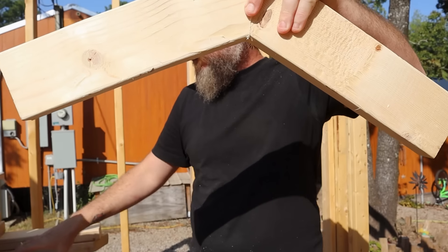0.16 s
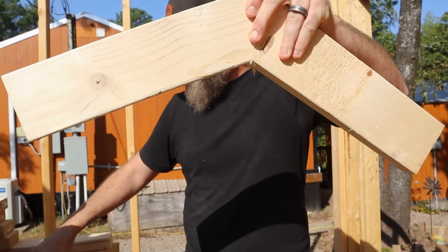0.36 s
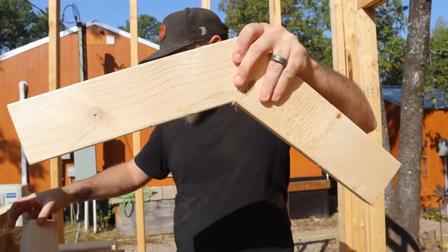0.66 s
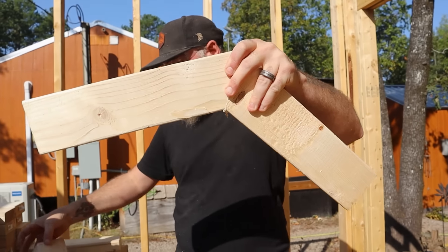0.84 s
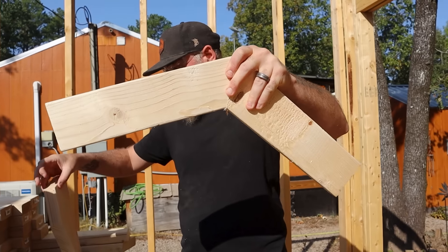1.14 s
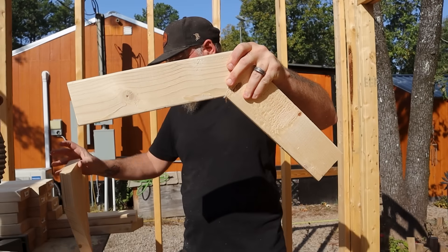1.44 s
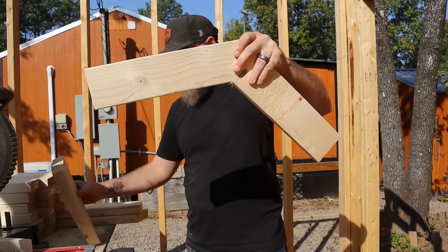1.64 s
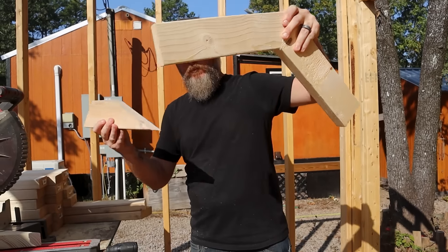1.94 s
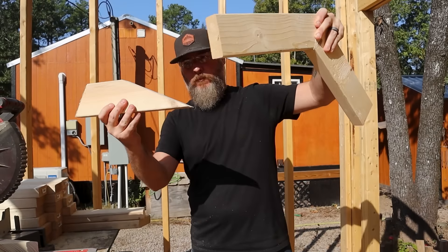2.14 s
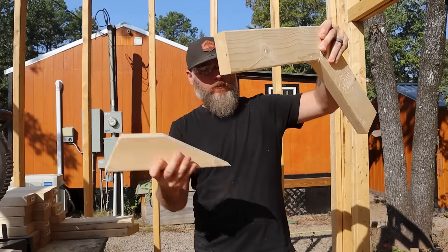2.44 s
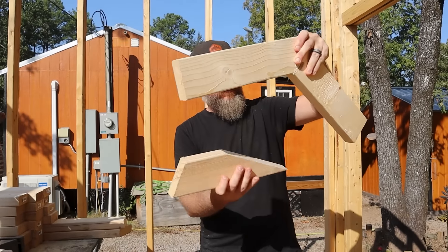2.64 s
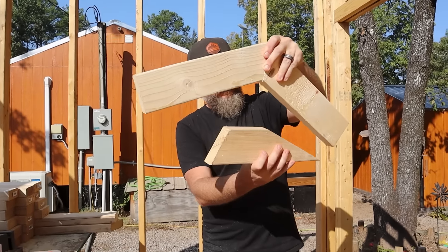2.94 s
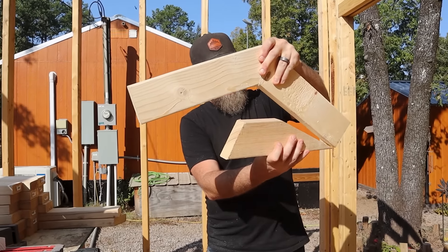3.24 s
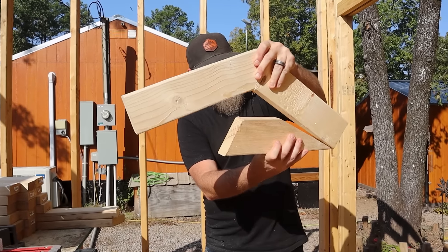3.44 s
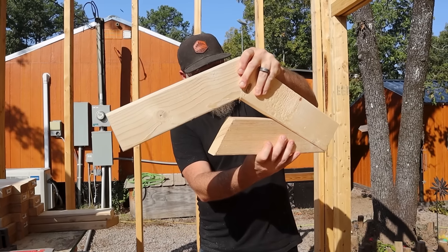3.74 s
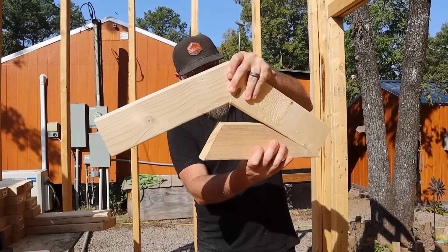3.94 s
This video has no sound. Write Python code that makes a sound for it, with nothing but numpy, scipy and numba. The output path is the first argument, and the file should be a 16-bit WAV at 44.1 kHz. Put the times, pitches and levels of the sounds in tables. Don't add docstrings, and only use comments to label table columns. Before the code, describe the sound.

Short pine boards knock, scrape and clatter on a stack outdoors, then quiet yard air with a distant crow and small birds.

```python
import sys
import numpy as np
from scipy import signal
from scipy.io import wavfile
from scipy.ndimage import uniform_filter1d
from numba import njit

SR = 44100
rng = np.random.default_rng(int(sys.argv[2]) if len(sys.argv) > 2 else 0)


def nominal_scale(level):
    x = np.asarray(level, float) / 20
    return 10 ** x


def materialize(psi):
    bounded = np.clip(np.atleast_2d(psi).T, -1, 1)
    quanta = np.round(bounded * 32767).astype(np.int16)
    wavfile.write(sys.argv[1], SR, quanta)


N = 180280
TIME = np.arange(N) / SR


@njit
def ring(x, hz, t60):
    pole = np.exp(2j * np.pi * hz / SR - np.log(1000) / (t60 * SR))
    state = 0j
    y = np.empty(len(x))
    for i in range(len(x)):
        state = state * pole + x[i]
        y[i] = state.imag
    return y


def unit(x):
    return x / np.sqrt(np.mean(x ** 2))


def band(x, hz, width_hz):
    return signal.lfilter(*signal.iirpeak(hz, hz / width_hz, fs=SR), x)


def steep_band(x, hz, width_hz):
    return unit(band(band(x, hz, width_hz), hz, width_hz))


def walk(rate_hz):
    hold = int(SR / rate_hz)
    steps = np.repeat(rng.standard_normal(N // hold + 1), hold)
    return unit(uniform_filter1d(uniform_filter1d(steps, hold), hold)[:N])


def grit(spread_db):
    size_db = spread_db * np.minimum(rng.exponential(size=N), 4)
    return unit(rng.standard_normal(N) * nominal_scale(size_db))


def with_echoes(x, t60, wet_db):
    t = TIME[:SR // 2]
    tail = rng.standard_normal(len(t)) * nominal_scale(-60 * t / t60) * (t > .006)
    tail *= nominal_scale(wet_db) / np.sqrt(np.sum(tail ** 2))
    return x + signal.fftconvolve(x, tail)[:N]


# freq_hz, level_db_per_hz
YARD_SPECTRUM = [(15, -26), (25, 5.5), (70, -1), (92, -11.5), (123, -3.5), (150, -14.5), (205, -13),
                 (300, -11.5), (604, -15), (881, -17.5), (1400, -13), (2000, -18.5), (4500, -23),
                 (15800, -33.5)]
# freq_hz, rms_db
MAINS_HUM = [(61, -68.5), (121, -69.5)]


def yard():
    hz, db = np.transpose(YARD_SPECTRUM)
    noise, swell = 0, walk(0.374)
    for f in 22 * 2 ** np.arange(0, 9.5, 1 / 3):
        level_db = np.interp(np.log(f), np.log(hz), db) + 10 * np.log10(f)
        flicker_db = 1.8 * min(1, 1200 / f) ** 0.36 * walk(10)
        level_db = level_db + 0.64 * swell + flicker_db
        noise = noise + nominal_scale(level_db) * steep_band(rng.standard_normal(N), f, f / 3)
    hum = sum(nominal_scale(d + 8.5 + 3.1 * walk(4.98)) * np.sin(2 * np.pi * f * TIME) for f, d in MAINS_HUM)
    return nominal_scale(-54) * unit(noise) + hum


def calls(notes, flutter_hz, rough):
    out, drift = np.zeros(N), walk(90)
    for s, length, db, start_hz, middle_hz, end_hz in notes:
        part = slice(int(s * SR), int((s + length) * SR))
        u = np.clip((TIME[part] - s) / length, 0, 1)
        arch = np.sin(np.pi * u)
        pitch = start_hz + (end_hz - start_hz) * u + (middle_hz - (start_hz + end_hz) / 2) * arch
        flutter_phase = 2 * np.pi * np.cumsum(flutter_hz * (1 + 0.11 * drift[part])) / SR
        tone_phase = 2 * np.pi * np.cumsum(pitch * (1 + 0.011 * drift[part])) / SR
        out[part] += nominal_scale(db) * arch ** 0.17 * (1 + rough * np.sin(flutter_phase)) * np.sin(tone_phase)
    return out


# start_s, length_s, level_db, top_hz
CROW_CAWS = [(2.096, 0.092, -46, 1490), (2.58, 0.031, -51, 1462), (2.625, .065, -52, 1436),
             (3.076, .095, -49.5, 1490), (3.201, 0.137, -60.5, 1394), (3.569, 0.06, -56.5, 1360)]
# start_s, length_s, level_db, start_hz, end_hz
BIRD_CHIRPS = [(2.17, .07, -61, 1920, 2014), (2.709, 0.035, -61, 2800, 2850), (2.7, .05, -65, 4050, 3950),
               (2.935, .025, -60, 2910, 2200), (3.0, .037, -63, 2910, 2500), (3.07, .029, -63, 2810, 2500),
               (3.343, 0.029, -59.5, 3220, 2500), (3.42, 0.028, -59, 2800, 2350),
               (3.623, .016, -57, 3090, 2300), (3.651, .093, -62, 2500, 1980),
               (3.999, 0.044, -59, 1316, 1050)]
# start_s, level_db
INSECT_PULSES = [(.16, -74), (.33, -71), (1.5, -76), (1.86, -75), (2.67, -73), (3.47, -80), (3.66, -78)]


def birds():
    caws = [(s, length, db, .92 * hz, hz, .91 * hz) for s, length, db, hz in CROW_CAWS]
    chirps = [(s, length, db, a, 1.03 * (a + b) / 2, b) for s, length, db, a, b in BIRD_CHIRPS]
    pulses = [(s, .052, db, 9290, 9290, 9290) for s, db in INSECT_PULSES]
    far = calls(caws, 114.8, 0.5) + calls(chirps, 90, 0.75) + calls(pulses, 70, 0.55)
    return with_echoes(far, t60=0.47, wet_db=-5.0)


# freq_hz, t60_s, level_db
STACK_MODES = [(63.1, 0.27, -10.5), (95.1, 0.12, -7.5), (136, 0.11, -4.5), (179, 0.27, -2), (213, 0.19, -1),
               (286, 0.027, -8.5)]
# freq_hz, width_hz, level_db
RASP_BANDS = [(637, 306, 2), (963, 190, -4), (1400, 420, 6), (1896, 265, -2.5)]
# peak_s, shake_db, settling_db_per_s, clatter_above_shake_db
STACK_JOLTS = [(.01, -62, 300, 18), (.095, -33, 168, -1.5), (.25, -37, 174, -10), (.44, -38.5, 250, -8),
               (.52, -38, 170, 0), (.68, -42.5, 150, -22), (.77, -38.5, 132, -2.5), (.86, -38.5, 200, 4),
               (.92, -36, 202, 3.5), (1.051, -36, 114, 1), (1.2, -51, 150, -14), (1.35, -35, 136, -12.5),
               (1.62, -47.5, 200, -16), (1.55, -54, 52, 1.5), (1.73, -49.5, 250, -9),
               (1.8, -48, 202, -14.5), (1.93, -49.5, 150, -0.5), (2.03, -40, 350, -14),
               (2.1, -35, 154, -12), (2.2, -47, 150, 0), (2.35, -46, 90, -5.5), (2.5, -45, 250, -13.5)]


def stack():
    s, db, settle, clatter_db = np.transpose(STACK_JOLTS)[:, :, None]
    late = TIME - s
    build_up = 1.56
    shake = nominal_scale(db - np.abs(settle) * np.where(late > 0, late, -build_up * late))
    clatter = np.sum(shake * nominal_scale(clatter_db), axis=0)
    rings = [nominal_scale(db) * unit(ring(grit(spread_db=5.5), float(hz), t60)) for hz, t60, db in STACK_MODES]
    drag = unit(sum(nominal_scale(db) * band(grit(spread_db=0.0), hz, w) for hz, w, db in RASP_BANDS[:2]))
    deep = shake.sum(axis=0) * unit(sum(rings[:2]))
    return deep + clatter * (unit(sum(rings[2:])) + nominal_scale(-17.5) * drag)


# start_s, length_s, level_db, open_hz, narrowest_hz
AIR_GAPS = [(1.14, .13, -50.5, 817, 1297), (2.005, .13, -52.5, 596, 780), (.0, 0.057, -48.5, 657, 680),
            (.55, 0.18, -54.5, 1400, 1382), (.625, .043, -50, 2140, 2160), (.71, .072, -63, 2000, 2090)]


def gaps():
    notes = [(s, length, db, hz, top, hz) for s, length, db, hz, top in AIR_GAPS]
    return calls(notes, 46.5, 0.16) * unit(band(rng.standard_normal(N), 34, 74))


# freq_hz, width_hz, level_db
FINE_BANDS = [(7320, 1400, -7), (9470, 960, -2.5), (10440, 1350, -2), (11800, 2700, 0.5), (14200, 5200, -8)]


def scuffs(rows, body, spread, broad_db):
    slips = grit(spread_db=2.5) * nominal_scale(2.2 * walk(250))

    def resonances(bands, wide):
        return unit(sum(nominal_scale(db + 2.8 * walk(30.07)) * steep_band(slips, hz, wide * w) for hz, w, db in bands))

    wood, fine, rasp = resonances(body, spread), resonances(FINE_BANDS, 2), resonances(RASP_BANDS, 2)
    wood = unit(wood + nominal_scale(broad_db) * steep_band(slips, 3160, 5100))
    out = np.zeros(N)
    for s, length, db, bright_db, slant, (fine_db, rasp_db) in rows:
        part = slice(int(s * SR), int((s + length) * SR))
        u = (TIME[part] - s) / length
        shape = np.sin(np.pi * np.clip(u, 0, 1)) ** 0.37 * nominal_scale(db + 2.7 * slant * (2 * u - 1))
        mix = wood[part] + nominal_scale(fine_db + bright_db) * fine[part] + nominal_scale(rasp_db - bright_db) * rasp[part]
        out[part] += shape * mix
    return out


# start_s, length_s, level_db, brightness_db, slant (-1 fading to 1 growing)
WOOD_DRAGS = [(.0, 0.053, -62.5, -7, -0.26), (0.052, .1, -51, 1, -.21), (.461, .1, -49, -1, 0.9),
              (0.556, 0.094, -57, 4.5, .1), (0.822, 0.062, -46, 0.5, -1), (1.016, 0.054, -50, 1.5, -.27),
              (1.137, 0.16, -64, -3.5, -.04), (1.393, 0.14, -58, -2.5, .24), (1.953, 0.15, -57, 1.5, .39),
              (2.33, 0.043, -57.5, -1.5, -.42), (2.394, .026, -59, 4, 0.015), (2.603, 0.077, -59, 3, .1)]
# start_s, length_s, level_db, slant
FINGER_RUBS = [(0.624, 0.054, -46.5, .84), (0.862, 0.016, -45.5, .1), (0.91, .025, -55, .1),
               (1.577, .041, -49, .2), (1.695, 0.07, -51.5, .5), (1.808, 0.017, -55, -.3),
               (2.438, 0.066, -49.5, -.02), (2.51, 0.034, -60, .1)]
# start_s, length_s, level_db, brightness_db
FACE_SLAPS = [(.568, .0078, -58, -1), (.668, .008, -43, -6), (0.694, .015, -52, 5),
              (0.819, 0.0097, -40.5, -2), (.841, .0049, -46, -8), (0.879, .01, -52.5, 7.5),
              (.976, 0.0077, -51.5, -2.5), (1.062, .0058, -48, -4), (1.1, .011, -45, 2.5),
              (1.298, 0.01, -42, 8), (1.308, 0.0071, -36, 4), (3.386, .014, -60.5, -7)]
# start_s, level_db, brightness_db
SPLINTER_TICKS = [(1.188, -54, -5), (1.226, -61, -2), (1.454, -66, -5), (1.467, -60, 0), (1.473, -53.5, -2),
                  (1.488, -58, 1), (1.512, -61.5, 2), (1.52, -57, -2), (1.641, -52, -6), (1.776, -57, -.3),
                  (3.023, -65, -8)]


def contacts():
    drags = [(*row, (-7, 3.6)) for row in WOOD_DRAGS]
    rubs = [(s, length, db, 0, slant, (-5.5, -20)) for s, length, db, slant in FINGER_RUBS]
    slaps = [(*row, -.3, (-9, 1.3)) for row in FACE_SLAPS]
    ticks = [(s, 0.0057, db, bright_db, 0, (4.9, -6)) for s, db, bright_db in SPLINTER_TICKS]
    return drags + rubs + slaps + ticks


# freq_hz, width_hz, level_db
GRAIN_BANDS = [(2130, 60, 0), (2590, 70, -6), (3300, 110, 0), (3620, 90, -3), (4300, 110, -4),
               (4930, 120, -5), (5900, 200, -3)]
# freq_hz, width_hz, level_db
PALM_BANDS = [(1330, 98, -7), (1910, 100, -5), (3460, 170, 1.5), (3680, 80, -4), (4340, 430, -10),
              (4980, 100, -7), (5460, 300, -6), (5900, 350, -4)]
# start_s, length_s, level_db, slant
PALM_BRUSH = (3.825, .11, -47, -0.3)


def rubbing():
    s, length, db, slant = PALM_BRUSH
    out = scuffs(contacts(), GRAIN_BANDS, spread=4.1, broad_db=6)
    out += scuffs([(s, length, db, 0, slant, (-11.5, -14))], PALM_BANDS, spread=2.2, broad_db=-17)
    return with_echoes(out + gaps(), t60=0.089, wet_db=-13.5)


def pushes(blows):
    force = np.full(N, 1e-18)
    for s, db, ms in blows:
        push = np.hanning(int(max(ms, .2) * SR / 1000) + 2)
        push = np.r_[.45 * push, -push] / push.sum()
        force[int(s * SR):int(s * SR) + len(push)] += nominal_scale(db) * push
    return force


# freq_hz, t60_s, end_db, middle_db, edge_db (by place struck)
BOARD_MODES = [(137, 0.042, -57, 14, -23), (162.3, 0.068, 8, 10, -34), (216.6, 0.14, -4.5, .3, -3),
               (279, 0.048, -0.5, 7, -24), (320.6, .09, -5, 2.5, 5.5), (362.4, 0.069, -0.5, 5, 3.5),
               (417, 0.11, -6.5, -9.5, -12.5), (488.6, 0.091, 1, 2, -1), (555.6, 0.048, 5, 2, 7),
               (638.6, 0.057, 6.5, 6.5, 4), (768, 0.1, -21, -16, -23), (812, 0.087, -0.5, -6, 0),
               (931, 0.075, 1.5, -19, -28), (1013, 0.023, -1, -6, -10), (1074, .06, -18, -18, -8),
               (1188, 0.054, 0, -24, -35), (1349, 0.02, -22, -16, 4), (1490, 0.12, -15, -0.5, 4),
               (1670, .05, -22, -22, -27), (1930, .05, -28, -16, -26), (2120, .04, -33, -24, -28),
               (2460, .05, -32, -24, -22), (2850, .03, -30, -26, -29)]
# start_s, level_db, contact_ms
END_BLOWS = [(.4172, -20, 1.047), (.4200, -28.5, 1.02), (.436, -32.5, 0.69), (3.3832, -51, 0.49),
             (1.0185, -38.5, 0.71), (1.1045, -44.5, 0.73)]
MIDDLE_BLOWS = [(.6694, -19.5, 1.25), (.6746, -24.5, 1.036), (.694, -49, 4), (1.034, -41, 1.33),
                (1.055, -36, 1.8), (1.3105, -35, 2.56), (.056, -32, 3.83), (.098, -39.5, 2.03),
                (.108, -42.5, 0.72), (1.902, -54.5, 0.82), (1.912, -51.5, 1.75), (1.94, -54.5, 1.35),
                (2.009, -42, 2.9), (2.03, -57, 2.6), (2.05, -53, 1.5), (2.105, -48.5, 1.82),
                (2.345, -59, 0.81), (2.375, -61, 0.99), (2.089, -41, 2.27), (2.33, -52.5, 1.2)]
EDGE_BLOWS = [(.8201, -18.5, 1.085), (.8253, -22.5, 1.0), (.833, -27, 1.12), (.841, -29, 0.695),
              (.846, -32, 1.48), (.865, -30, 1.26), (.893, -30.5, 2.17), (.903, -40, 2.04), (.92, -57, 3.1),
              (.976, -42.5, 1.57), (1.194, -53.5, 1.23)]
# start_s, level_db, contact_ms
STACK_THUDS = [(3.472, -31.5, 11.2), (3.8, -48, 10.0), (2.008, -35.5, 2.85), (2.088, -36.5, 3.3),
               (.055, -35.5, 2.7), (0.063, -34.5, 4.1), (1.310, -35.5, 2.2), (4.03, -56, 1.4),
               (4.065, -53, 2.3)]
# freq_hz, width_hz, level_db
RATTLE_BANDS = [(585, 237, 10), (1010, 240, -12), (1440, 240, -16), (2000, 250, -22), (2500, 170, -13.5)]


def board():
    end, middle, edge = pushes(END_BLOWS), pushes(MIDDLE_BLOWS), pushes(EDGE_BLOWS)
    blows = end + middle + edge
    out = np.zeros(N)
    for k, (hz, t60, end_db, middle_db, edge_db) in enumerate(BOARD_MODES):
        drive = nominal_scale(end_db) * end + nominal_scale(middle_db) * middle + nominal_scale(edge_db) * edge
        out += np.sign(k % 3 - .5) * ring(drive, float(hz), t60)
    out += nominal_scale(38.5) * band(blows, 600, 1000)
    shake = signal.lfilter([1], [1, -nominal_scale(-60 / (.09 * SR))], np.abs(blows))
    rattle = unit(sum(nominal_scale(db) * steep_band(grit(spread_db=2.5), hz, 1.6 * w) for hz, w, db in RATTLE_BANDS))
    out += nominal_scale(-13.0) * shake * rattle
    out = signal.sosfilt(signal.butter(2, 120, "high", fs=SR, output="sos"), out)
    drive = nominal_scale(-9.0) * blows + pushes(STACK_THUDS)
    out += sum(nominal_scale(db) * ring(drive, float(hz), 1.11 * t60) for hz, t60, db in STACK_MODES)
    return with_echoes(out, t60=0.27, wet_db=-17.5)


def scene():
    return (yard() + birds() + stack() + rubbing() + board())[None]


def band_limit(x):
    return signal.sosfilt(signal.butter(12, 15950, fs=SR, output="sos"), x)


def record(dry):
    x = signal.sosfilt(signal.butter(2, 30, "high", fs=SR, output="sos"), dry)
    x = np.tanh(1.068 * x) / 1.131
    x = signal.sosfilt(signal.ellip(8, .2, 60, 15800, fs=SR, output="sos"), x)
    return band_limit(x)


dry = scene()
out = record(dry)
materialize(out)
```